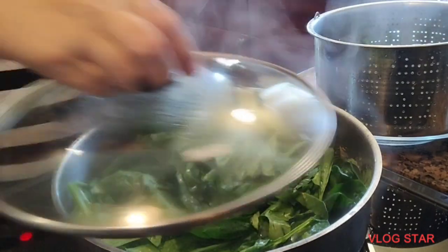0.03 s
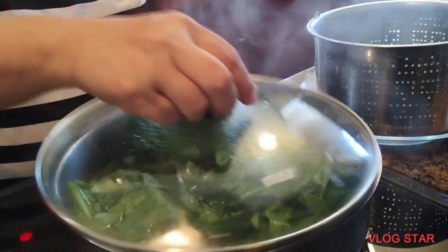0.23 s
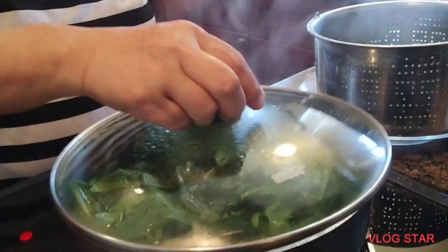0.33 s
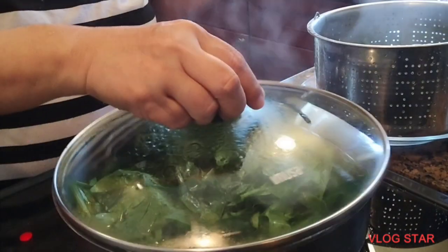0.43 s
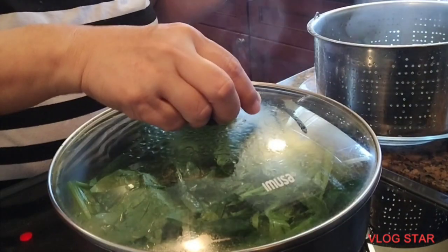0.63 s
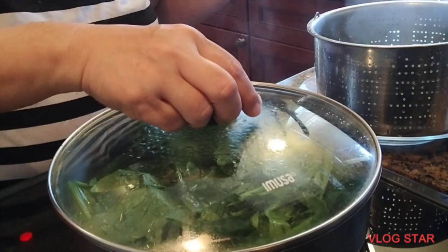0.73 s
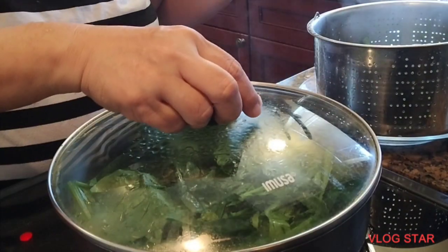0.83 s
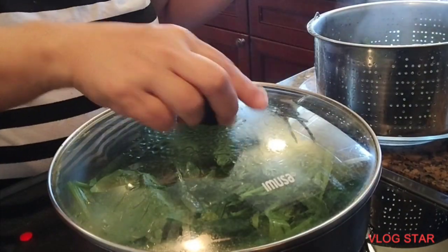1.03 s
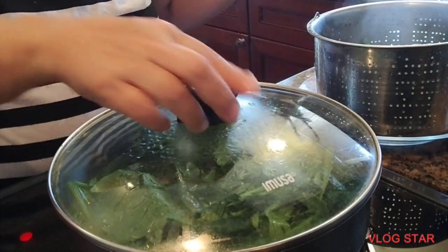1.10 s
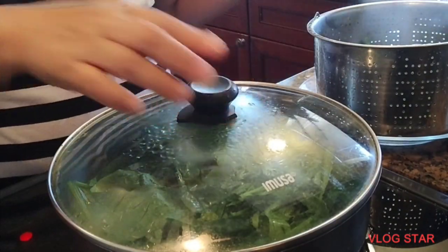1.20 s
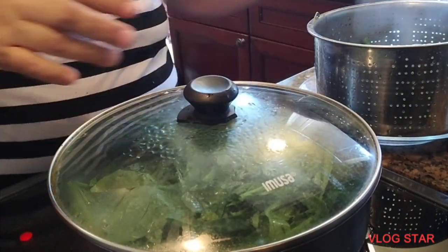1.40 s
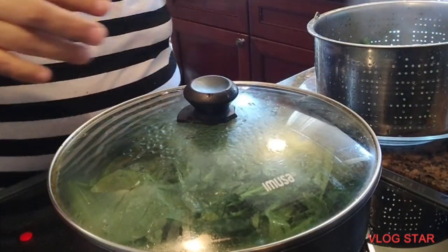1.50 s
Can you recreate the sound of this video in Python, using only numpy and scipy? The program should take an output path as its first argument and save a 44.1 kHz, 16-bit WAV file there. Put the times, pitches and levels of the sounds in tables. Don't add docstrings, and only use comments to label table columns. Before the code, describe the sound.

Close up in a small kitchen, a pot lid clanks onto a steel pot, rocking through a dense half-second clatter with hollow thuds before seating; afterwards only a quiet simmer, low hum and soft hiss remain.

```python
import sys
import numpy as np
from scipy import signal
from scipy.io import wavfile

SR = 44100
rng = np.random.default_rng(int(sys.argv[2]) if len(sys.argv) > 2 else 0)


def wrap_up_sound(samples):
    columns = np.atleast_2d(samples).T
    tamed = np.clip(columns, -1, 1)
    steps = np.round(tamed * 32767).astype(np.int16)
    wavfile.write(sys.argv[1], SR, steps)


def attenuation_scalar(level_db):
    decades = np.asarray(level_db, float) / 20
    return 10 ** decades


N = 68355
TIME_S = np.arange(N) / SR
SIDES = np.array([[1.], [-1.]])

# start [s], thud [dB], clank re thud [dB], favoured thud [Hz], favoured clank [Hz].
CONTACTS = [(.152, -36, -34, 470, 800), (.151, -41, -42, 110, 800), (0.37, -25, -29, 110, 1313),
            (0.387, -18.5, -38, 152, 900), (.228, -6, -16, 485, 2350), (0.228, -12, -12, 119.7, 5330),
            (.234, -13, -30, 177, 950), (0.248, -20, -18.5, 111, 2350), (0.261, -26, -32, 110, 2350),
            (.272, -13, -22.5, 114.2, 2350), (0.288, -9.5, -11, 177, 2880), (.321, -18, -5, 215, 1420),
            (0.423, -19.5, -24, 104, 3700), (.464, -21, -17.5, 130, 1240), (0.489, -9, -13.5, 97, 1275),
            (0.52, -10.5, -11, 160.5, 1490), (.537, -12, -34, 130, 1800), (.565, -19, -12.5, 483, 1420),
            (0.2864, -8, -4.5, 412, 1050), (0.2943, -10, -8, 160, 1385), (0.298, -13, -8.5, 345, 2350),
            (0.31, -10, -7.5, 344, 1830), (0.336, -10, -19.5, 287, 910), (0.349, -15, -21, 130, 800),
            (0.4, -47.5, -9.5, 356, 940), (0.412, -14.5, -20.5, 130, 910), (.442, -15, -18, 442, 2420),
            (.447, -8.5, -18.5, 145, 3050), (0.48, -16, -8, 170, 1170), (0.4935, -14.5, 4.5, 449, 1165),
            (0.496, -12.5, -5, 129.5, 1850), (.510, -17, 3, 130, 736), (.512, -14, 0.5, 283, 2350),
            (.530, -8.5, -9.5, 182.4, 1500), (0.543, -11, -5.5, 399, 960), (.556, -10, -20.5, 485, 1440),
            (0.591, -14.5, -20, 130, 745), (0.608, -20, -20.5, 173, 2350)]
# time [s], level [dB].
SLIDE_LEVEL = [(0.26, -110), (0.29, -37), (0.34, -43), (0.38, -58.5), (0.47, -47), (0.5, -31.5),
               (0.56, -42.5), (0.6, -56), (0.85, -110)]
# frequency [Hz], likeness [-1 to 1].
SIMMER_LIKENESS = [(60, 0.66), (180, 1), (550, -0.12), (1650, -0.25), (4970, -0.024), (15000, -0.031)]
# frequency [Hz], left-right [dB].
SIMMER_LEAN = [(60, 1), (180, 4), (550, 3.5), (1650, -1), (4970, 0), (15000, -4.5)]


def rms_one(x):
    return x / np.sqrt(np.mean(x ** 2) + 1e-20)


def along(rows, x, warp=np.log):
    table = np.array(rows)
    return np.interp(warp(x), warp(table[:, 0]), table[:, 1])


def in_time(rows):
    return attenuation_scalar(along(rows, TIME_S, np.asarray))


def drift(rate_hz):
    pole = np.exp(-2 * np.pi * rate_hz * 40 / SR)
    white = rng.standard_normal(N // 40 + 2002)
    slow = signal.lfilter([1], [1, -2 * pole, pole * pole], white)[2000:]
    return np.interp(np.arange(N) / 40, np.arange(len(slow)), rms_one(slow))


def swell(start_s, half_s):
    return np.exp(-((TIME_S - start_s) / half_s) ** 2)


def ring(clicks, hz, t60_s):
    pole, turn = attenuation_scalar(-60 / (t60_s * SR)), 2 * np.pi * hz / SR
    return signal.lfilter([0, np.sin(turn)], [1, -2 * pole * np.cos(turn), pole * pole], clicks + 1e-18)


def clicks_at(start_s, level_db):
    out = np.zeros(N)
    np.add.at(out, (start_s * SR).astype(int), attenuation_scalar(level_db))
    return out


def grains(rate_per_s, spread_db):
    sizes = attenuation_scalar(spread_db * np.minimum(rng.exponential(1, N), 4)) * rng.choice([-1, 1], N)
    return rms_one(sizes * (rng.random(N) < rate_per_s / SR))


def bands(spectrum, lean, shape):
    edges_hz = 22 * 2 ** np.arange(0, 9.7, 1 / 3)
    lowest_hz, highest_hz = spectrum[0][0] * .85, spectrum[-1][0] * 1.15
    white = rng.standard_normal((2, 2, N))
    out, power = 0, 0
    for k, (low, high) in enumerate(zip(edges_hz, edges_hz[1:])):
        hz = np.sqrt(low * high)
        if not lowest_hz < hz < highest_hz:
            continue
        band = signal.butter(2, [low, high], "band", fs=SR, output="sos")
        mid, side = signal.sosfilt(band, white[k % 2])
        gain, alike = shape(hz)
        alike = np.clip(alike, -1, 1)
        level = attenuation_scalar(along(spectrum, hz))
        power += level ** 2 * (high - low) * 2 / SR
        stereo = np.sqrt(1 + alike) * mid + np.sqrt(1 - alike) * side * SIDES
        out = out + level * attenuation_scalar(SIDES * along(lean, hz) / 2) * gain * stereo
    return out / np.sqrt(2 * power)


def port(x):
    centre_hz, width_hz = 9750, 1160
    return signal.lfilter(*signal.iirpeak(centre_hz, centre_hz / width_hz, fs=SR), x)


def seated():
    return attenuation_scalar(-np.clip((TIME_S - .565) * 502, 0, 10.5))


def kitchen(x):
    t60_s, wall_cut_hz = 0.44, 2900
    dull = np.exp(-2 * np.pi * wall_cut_hz / SR)
    out = np.zeros((2, N))
    for k, lag in enumerate((rng.uniform(.015, .045, 16) * SR).astype(int)):
        loop, state = x.copy(), [0.]
        gain = attenuation_scalar(-60 * lag / SR / t60_s)
        for i in range(lag, N, lag):
            back, state = signal.lfilter([gain * (1 - dull)], [1, -dull], loop[i - lag:i], zi=state)
            loop[i:i + lag] += back[:N - i]
        out[k % 2] += (loop - x) * (-1) ** (k // 2)
    return out


def hob_hum():
    # time [s], swell [dB], half length [s].
    gulps = [(0.014, -6, 0.043), (0.695, 2, 0.016), (0.771, 1.5, 0.024), (0.886, -0.5, 0.012),
             (1.015, -3.5, 0.024), (1.089, -2, .015), (1.16, 2.5, 0.029), (1.198, 1, 0.013),
             (1.24, -1.5, 0.016), (1.301, 2.5, 0.024), (1.359, 3, 0.01), (1.416, 3.5, .025),
             (1.469, 9, 0.0076), (1.507, 4, .015)]
    gulp = sum(attenuation_scalar(db) * swell(start_s, half_s) for start_s, db, half_s in gulps)
    return (0.24 + 1.3 * gulp) * attenuation_scalar(5.5 + .5 * drift(0.85)) * np.sin(2 * np.pi * 120.5 * TIME_S)


def boil_rumble():
    # frequency [Hz], density [dB per Hz].
    rumble_spectrum = [(40, -15.5), (75, 4.5), (119, 8), (200, -1), (400, -5), (580, -12), (740, -12.5),
                       (1400, -19.5), (3600, -32)]
    # time [s], rise [dB].
    surges = [(.79, 4.9), (0.889, 7), (1.02, 2.7), (1.18, 6.6), (1.42, 3)]
    surge_db = drift(17) + sum(db * swell(start_s, 0.021) for start_s, db in surges)

    def shape(hz):
        share = np.clip(np.log2(hz / 279), .3, 1.2)
        return attenuation_scalar(surge_db * share + 2.8 * drift(23)), along(SIMMER_LIKENESS, hz)

    return attenuation_scalar(-56.5) * bands(rumble_spectrum, SIMMER_LEAN, shape)


def steam_hiss():
    # frequency [Hz], density [dB per Hz].
    hiss_spectrum = [(1470, 1.5), (2500, -2), (3300, -5.5), (6200, -5), (8170, -4), (11000, -18.5),
                     (13000, -7), (15600, -8), (16500, -3)]
    hiss = bands(hiss_spectrum, SIMMER_LEAN,
                 lambda hz: (attenuation_scalar(0.34 * drift(23)), along(SIMMER_LIKENESS, hz)))
    return attenuation_scalar(-69.5) * (hiss + attenuation_scalar(9.5) * port(hiss))


def air_boom():
    # frequency [Hz], width [Hz], level [dB].
    air_modes = [(121.4, 35, -17.5), (99, 13, -11.5), (262, 44, -15.5), (371.4, 46, -16.5),
                 (714.6, 46, -22)]
    bursts = grains(rate_per_s=1500, spread_db=2.0) * attenuation_scalar(1.3 * drift(13.13))
    return rms_one(sum(attenuation_scalar(db) * rms_one(ring(bursts, hz, 1.78 / width_hz))
                       for hz, width_hz, db in air_modes))


def simmer():
    # time [s], air space level [dB].
    air_level = [(0.0, -57), (0.21, -53), (0.25, -29.5), (0.378, -43.5), (0.43, -31.5), (0.832, -49.5),
                 (1.082, -54.5), (1.32, -52), (1.55, -55.5)]
    boom = air_boom()
    rumble = boil_rumble()
    hiss = steam_hiss()
    return in_time(air_level) * (boom + hob_hum()) + rumble + hiss


def crack():
    # start [s], peak [dB], left-right [dB], extra ring of the near port [dB].
    sharp_contacts = [(.2283, -19.5, 5, 10.5), (.2862, -15, 1.5, 2), (0.2941, -16.5, 6, 17.5),
                      (0.2996, -22.5, 7, 16.5), (.3105, -31.5, 4.5, 14), (0.3324, -30, -4, 12.5),
                      (0.4115, -35, 2.5, 12), (.4420, -27.5, 6.5, -4), (0.4444, -42.5, 2, 6.5),
                      (.481, -42.5, 8, 14), (.488, -40, 14, 12.5), (.515, -30, 2, -4), (.536, -36, -2, 2),
                      (.556, -32.5, 4, -10), (.321, -38, 7, 10), (.465, -59, 0, 8), (0.4927, -18, 14, -18),
                      (.4975, -17.5, 0.5, -0.5), (0.508, -17.5, -4, -0.5), (0.5296, -27, 7, 5),
                      (0.544, -27, 3.5, -8)]
    # frequency [Hz], density [dB per Hz].
    crack_spectrum = [(290, 2), (500, -12), (1020, -9.5), (2320, -5.5), (3350, -13.5), (7490, -16),
                      (10000, -20), (15600, -29.5), (16500, -46.5)]
    # frequency [Hz], left-right [dB].
    crack_lean = [(60, 0.5), (150, 2), (380, 11.5), (950, 4), (2380, -7.5), (5980, -2.5), (15000, 22)]
    # frequency [Hz], t60 [s].
    metal_t60 = [(600, 0.2), (2500, 0.031), (6000, 0.11), (10000, 0.041), (16000, 0.017)]
    # frequency [Hz], t60 [s].
    room_t60 = [(600, 0.485), (2500, 0.5), (5000, 0.26), (16000, 0.19)]
    start_s, peak_db, pan_db, port_db = np.transpose(sorted(sharp_contacts))
    power = np.array([clicks_at(start_s, 2 * (peak_db - 6) + pan_db * side) for side in (1, -1)]) + 1e-18
    grind = (in_time(SLIDE_LEVEL) * attenuation_scalar(-5.5 + 2.8 * drift(43))) ** 2
    seat = seated() ** 2

    def fade(table, hz):
        return signal.lfilter([1], [1, -attenuation_scalar(-120 / (along(table, hz) * SR))], power)

    def shape(hz):
        metal = seat * (fade(metal_t60, hz) + grind)
        room = seat ** 0.48 * attenuation_scalar(2 * -16) * fade(room_t60, hz)
        return np.sqrt(metal + room), 0.18

    out = bands(crack_spectrum, crack_lean, shape)
    latest = np.clip(np.searchsorted(start_s * SR, np.arange(N)) - 1, 0, None)
    near = attenuation_scalar(1 + port_db[latest]) * port(out[0])
    return out + [near, 0 * near]


def struck(modes, force_db, favoured_hz, slide, width, spread_db, loss_db):
    favour_oct, favour_db, touch_s = 0.25, 18, .0022
    start_s = np.array(CONTACTS)[:, 0]
    touch = np.arange(4)
    count, size = len(start_s), (48, 4)
    when_s = start_s[:, None] + touch_s * touch * rng.uniform(.7, 1.3, size)[:count]
    out = 0
    for hz, level_db, t60_s in modes:
        near_db = favour_db * (np.exp(-(np.log2(hz / favoured_hz) / favour_oct) ** 2) - .5)
        uneven_db = spread_db * rng.standard_normal(size)[:count]
        touch_db = (force_db + near_db)[:, None] - loss_db * touch + uneven_db
        blows = clicks_at(when_s.ravel(), touch_db.ravel())
        tone = ring(attenuation_scalar(level_db) * (blows + slide), hz, t60_s)
        quarter_late = np.gradient(tone) * SR / (2 * np.pi * hz)
        turn = width * rng.uniform(-1.5, 1)
        out = out + np.cos(turn) * tone + np.sin(turn) * quarter_late * SIDES
    return out


def held_modes(modes):
    split, grip_t60_s = .03, .052
    held = []
    for hz, level_db, t60_s in modes:
        for k in (-1, 0, 1):
            split_hz = hz * (1 + split * k * rng.uniform(0.532, 1.24))
            held.append((split_hz, level_db - 5 - 2 * abs(k), min(t60_s, grip_t60_s * (1.4 - 0.18 * abs(k)))))
    return held


def pot_and_lid():
    # frequency [Hz], level [dB], t60 [s].
    pot_modes = [(91.5, -21.5, 0.089), (108.2, 2.5, 0.126), (130, -3.5, 0.086), (178.7, 1, 0.1),
                 (215, -11, 0.112), (274.6, -5, 0.11), (345, -7.5, 0.086), (415, -10.5, 0.082),
                 (463.1, -2.5, 0.05), (510, -15.5, 0.02), (152.3, -4, 0.085)]
    # frequency [Hz], level [dB], t60 [s].
    lid_modes = [(739, -13, 0.36), (756.6, 0.5, 0.19), (838.5, -3.5, 0.3), (927, -9.5, 0.038),
                 (1018, -21, 0.18), (1192, -6, 0.039), (1371, -4, 0.36), (1580, -6, 0.016),
                 (1738, -7.5, 0.09), (2030, -8.5, 0.069), (2350, -4, 0.21), (2880, -6, 0.24),
                 (3760, -7.5, 0.084), (5420, -14.5, 0.055)]
    _, thud_db, clank_db, thud_hz, clank_hz = np.transpose(CONTACTS)
    slide = in_time(SLIDE_LEVEL) * grains(rate_per_s=730, spread_db=2) * 0.034
    thud = struck(pot_modes, thud_db - 13, thud_hz, slide * attenuation_scalar(14.5),
                  width=0.067, spread_db=2.2, loss_db=12)
    thud = signal.sosfilt(signal.butter(2, 1500, fs=SR, output="sos"), thud)
    clank = struck(held_modes(lid_modes), thud_db + clank_db - 11.5, clank_hz, slide * attenuation_scalar(2),
                   width=1.135, spread_db=6.5, loss_db=4.5)
    return thud * seated() ** .5, clank * seated() * attenuation_scalar(1.7 * SIDES)


def scene():
    thud, clank = pot_and_lid()
    echo = kitchen(clank.mean(axis=0) + attenuation_scalar(-2.5) * thud.mean(axis=0))
    side = SIDES * (echo[0] - echo[1]) / 2
    echo = echo - signal.sosfilt(signal.butter(2, 260, fs=SR, output="sos"), side)
    blows = thud + clank + attenuation_scalar(-20.5) * echo + crack()
    gap_hz, gap_width_hz = 618, 93
    gap = signal.lfilter(*signal.iirpeak(gap_hz, gap_hz / gap_width_hz, fs=SR), blows)
    return blows - .6 * gap + simmer()


def low_pass(x):
    return signal.sosfilt(signal.butter(12, 16800, fs=SR, output="sos"), x)


def record(dry):
    low_cut_hz, top_cut_hz, ceiling = 85, 16700, 2.0
    x = signal.sosfilt(signal.butter(6, low_cut_hz, "high", fs=SR, output="sos"), dry) + attenuation_scalar(-33) * dry
    noise_band = signal.butter(2, [36, 75], "band", fs=SR, output="sos")
    mid, side = signal.sosfilt(noise_band, rng.standard_normal((2, N)))
    x = x + attenuation_scalar(-70) * rms_one(mid + .45 * SIDES * side)
    rounded = ceiling * np.tanh(x / ceiling)
    return low_pass(signal.sosfilt(signal.cheby2(14, 60, top_cut_hz, fs=SR, output="sos"), rounded))


dry = scene()
out = record(dry)
wrap_up_sound(out)
```